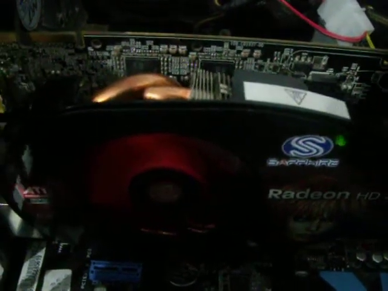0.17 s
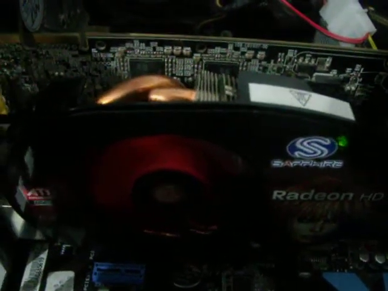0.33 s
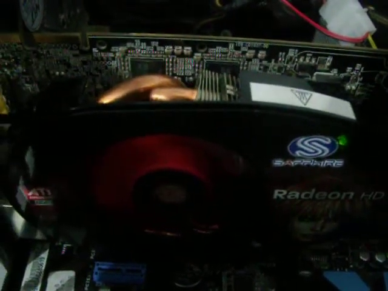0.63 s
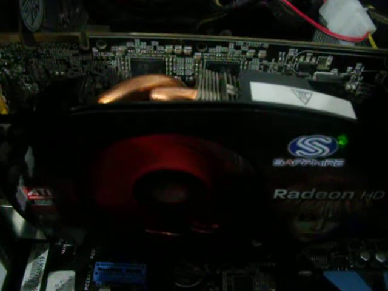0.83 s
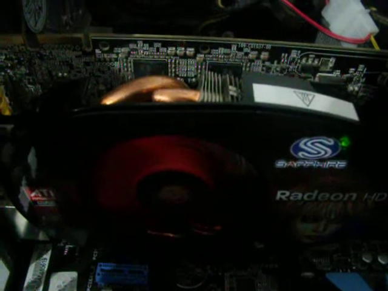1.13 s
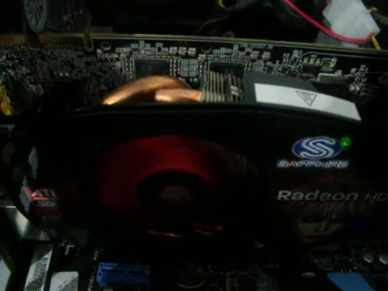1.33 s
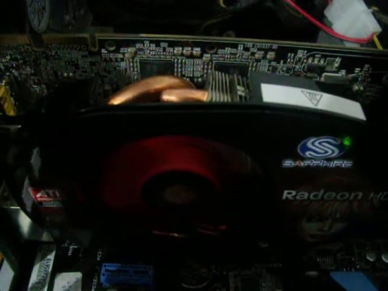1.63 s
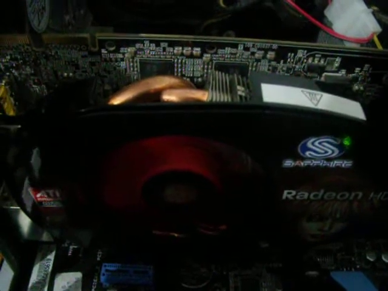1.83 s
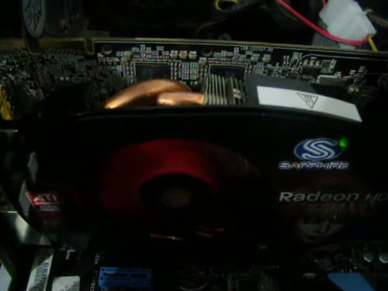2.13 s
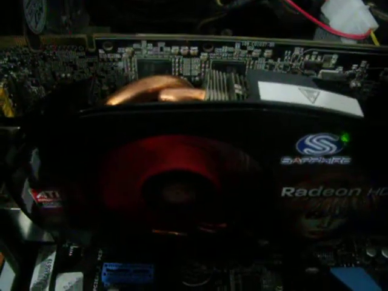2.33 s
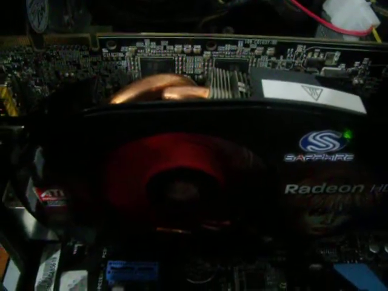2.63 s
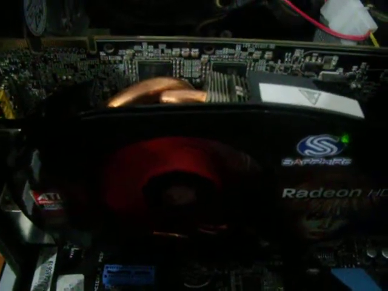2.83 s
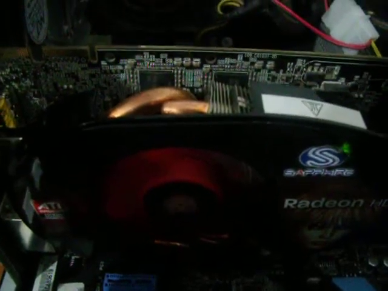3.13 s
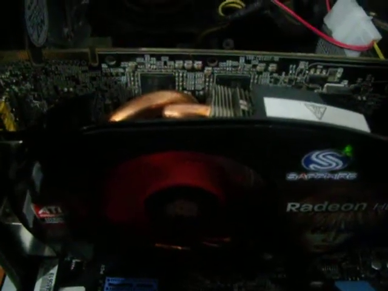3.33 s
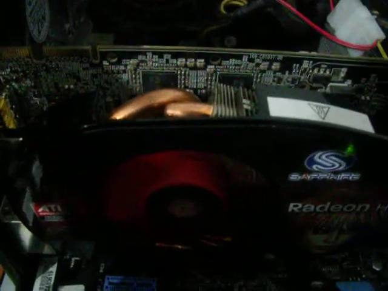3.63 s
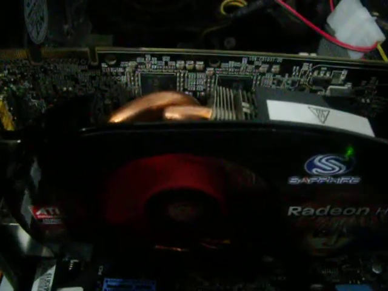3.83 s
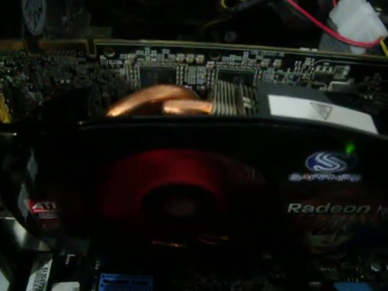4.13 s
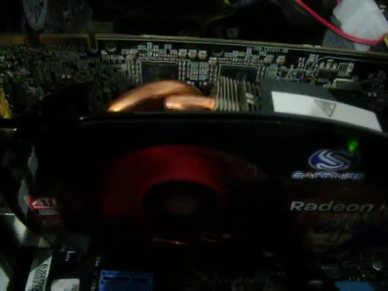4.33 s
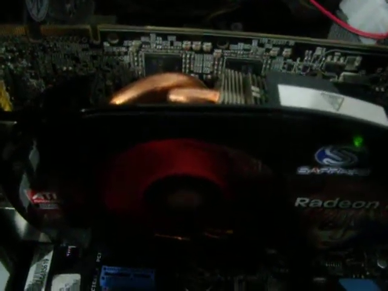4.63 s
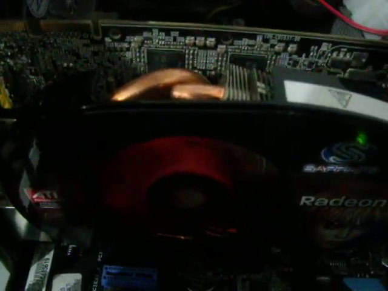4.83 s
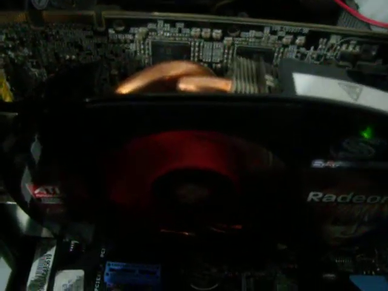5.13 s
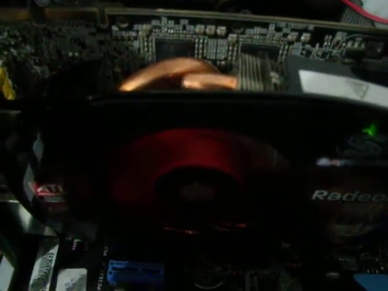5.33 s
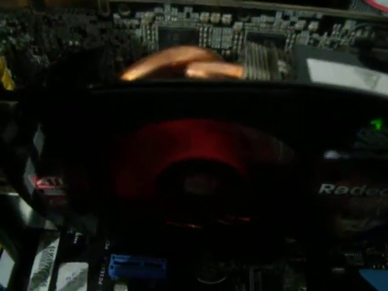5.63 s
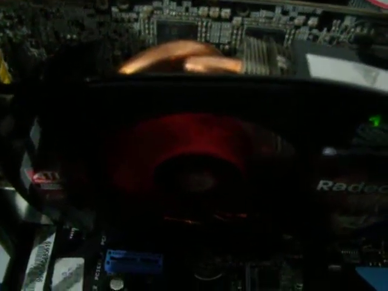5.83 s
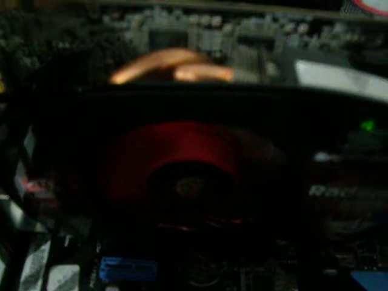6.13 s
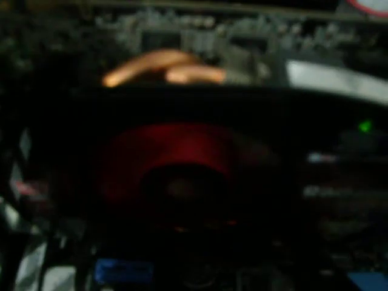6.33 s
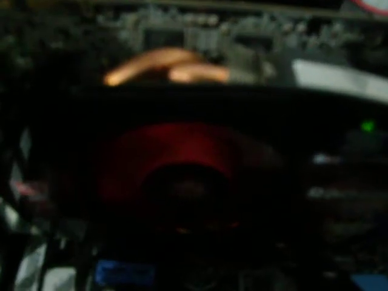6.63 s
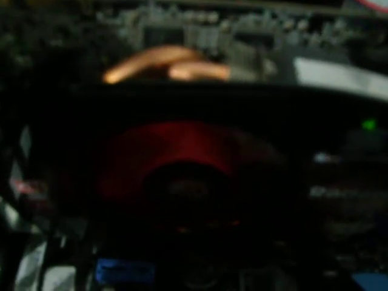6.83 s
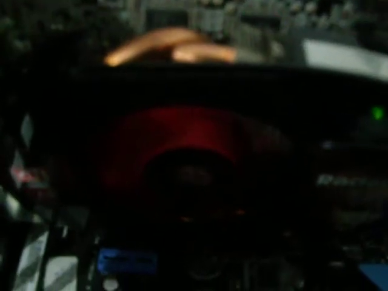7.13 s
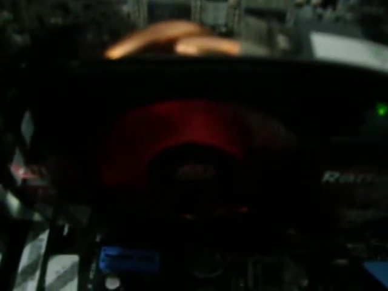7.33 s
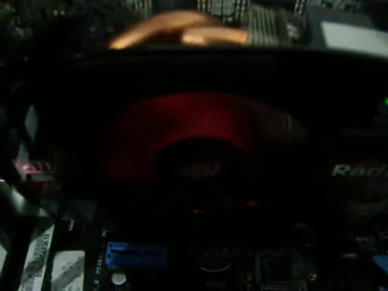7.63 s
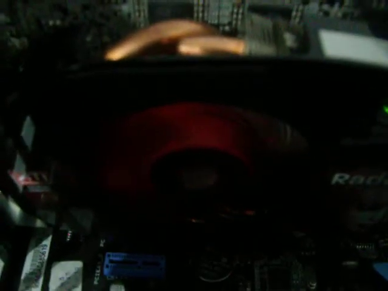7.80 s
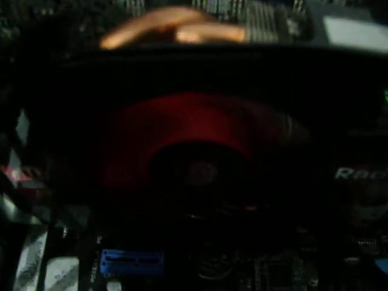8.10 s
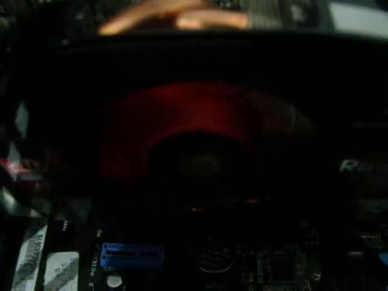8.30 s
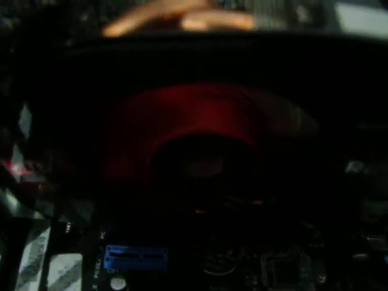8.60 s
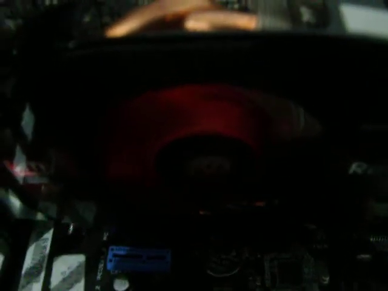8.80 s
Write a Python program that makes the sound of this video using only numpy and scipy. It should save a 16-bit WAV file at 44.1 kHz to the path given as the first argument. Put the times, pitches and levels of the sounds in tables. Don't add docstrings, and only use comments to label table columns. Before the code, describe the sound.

A handheld microphone sits close to cooling fans in an open computer case. From the start there is a steady airy whir, a low hum around 110 Hz, a faint low shudder, and blade tones near 1170 Hz that waver and beat as two rotors drift. Over it, a lens focus motor ticks rapidly, about thirty small dry clicks a second, with heavier clusters several times each second. Plastic creaks at 1.6, and a bright hard snap overloads at 1.77, with lighter ticks after. The loudest crack comes at 5.0, then a thick creak and knock at 5.6. Around 5.6 to 6 the case hum and its overtones disappear while draught buffeting swells low and lumpy. More creaks come at 6.4, 7.4, 8.1 and 8.8, the one at 8.1 with a firm snap. From about 6.6 a thin, hissy whistle near 4.7 kHz slowly rises until the end, around 9 seconds. The top end is dull.

```python
import sys
import numpy as np
from scipy import signal
from scipy.fft import rfft, irfft
from scipy.io import wavfile
from scipy.ndimage import uniform_filter1d

SR = 44100
rng = np.random.default_rng(int(sys.argv[2]) if len(sys.argv) > 2 else 0)


def ratio(d):
    e = np.asarray(d, float) / 20
    return 10 ** e


def wav_out(sig):
    wavfile.write(sys.argv[1], SR, np.round(np.clip(np.atleast_2d(sig).T, -1, 1) * 32767).astype(np.int16))


N = 395136

# time in seconds, level in dB.
CASE_HUM = [(0.1, -35), (0.42, -33.5), (3.2, -37), (3.56, -36.5), (3.9, -38), (5.9, -36.5)]
# multiple of the hum, level in dB.
CASE_ORDERS = [(3, -4.5), (4, -1), (5, -6), (6, -2), (6.92, -12), (7.93, 2), (8.93, 3), (10, -1.5),
               (18, -3.5)]
CASE_HUM_HZ, CASE_OVERTONES_DB = 111.35, -48.5

# start in seconds, stop in seconds, level in dB.
SHUDDER = [
    (0, .78, -47.5),
    (1.553, 2.15, -46.5),
    (2.3, 3.203, -57),
]
SHUDDER_HZ = 50.5

# time in seconds, level in dB.
APPROACH = [(0, -43.5), (2.4, -47), (3.2, -46), (4.5, -42), (5.5, -35.5), (5.95, -40), (6.06, -31.5),
            (6.2, -36), (6.36, -34), (6.75, -35.5), (7.05, -33.5), (7.5, -32), (7.9, -33.5), (8.05, -29.5),
            (8.2, -32), (8.7, -32.5), (8.88, -31.5), (8.96, -33.5)]
# frequency in Hz, level in dB per Hz.
DRAUGHT_SPECTRUM = [(40, -18), (70, -6), (110, 9.5), (150, 5), (200, 3), (300, -2), (420, -15.5),
                    (700, -30)]
# frequency in Hz, level in dB per Hz.
RUSH_SPECTRUM = [(15, -36.5), (30, -23.5), (55, -13), (100, -17), (160, -14.5), (240, -13), (720, -8.5),
                 (1000, -12.5), (1250, -8.5), (1600, -15.5), (2680, -16.5), (3700, -23.5), (4880, -24.5),
                 (6150, -36), (8000, -71)]
# frequency in Hz, width in Hz, level in dB.
DUCT = [(856, 19, -3), (1011, 12, -1.5), (1824, 170, -0.5), (2700, 330, -4)]
RUSH_DB, RUSH_DB_PER_DRAUGHT_DB = -35.5, 0.12

# time in seconds, level in dB.
WHISTLE = [(6.6, -58.5), (6.88, -58), (7.12, -49.5), (7.6, -45), (8.24, -41), (8.96, -39)]
# multiple of its pitch, level in dB.
WHISTLE_LINES = [(.99, -13), (1.0093, -8.5)]
WHISTLE_HZ, WHISTLE_WIDTH_HZ = 4730, 330

# time in seconds, level in dB, rustle t60 in seconds, pitch in Hz.
CREAKS = [(1.565, -23, 0.06, 1300), (1.585, -11.5, 0.036, 1300), (1.81, -21, 0.12, 1490),
          (5.559, -2, 0.079, 490), (5.576, -13, 0.096, 810), (5.575, -16, .05, 2700),
          (6.378, -15, 0.033, 1300), (6.401, -7, 0.076, 1390), (6.405, -4.5, 0.039, 844),
          (6.425, -21, 0.027, 2200), (7.441, -16.5, 0.2, 950), (8.096, -6, 0.12, 494),
          (8.096, -11.5, 0.019, 2970), (8.115, -9, 0.07, 1450), (8.836, -12.5, 0.14, 880),
          (8.836, -18, .04, 3000), (8.856, -10.5, 0.11, 1300)]
# time in seconds, level in dB, brightness in dB per octave.
SNAPS = [
    (1.5852, -19, 3),
    (1.7684, -8, 8.5),
    (1.8102, -26.5, -8),
    (1.8259, -19.5, 3),
    (5.0096, -2.5, 3.5),
    (5.5593, -19, -8),
    (7.4403, -17.5, -4.5),
    (8.096, -12, -2),
    (8.838, -18, -1),
    (8.886, -30, -13),
]
# frequency in Hz, level in dB, t60 in seconds.
SHELL_MODES = [(594, -3.5, 0.0096), (980, -7, 0.035), (1297, -6.5, 0.022), (2067, 0, 0.0085),
               (2790, -19.5, .012), (2930, -25, 0.0066), (3434, -16, 0.013), (4816, -14, 0.0063)]

# frequency in Hz, width in Hz, level in dB, ring 0-2 (low, middle, high).
BARREL = [(950, 250, -1.5, 0), (1893, 360, 0, 0), (2200, 150, -7, 0), (2715, 340, -1.5, 1),
          (3120, 350, -4.5, 1), (3795, 840, -4, 2), (4326, 415, -5, 2.6), (4750, 1000, -11.5, 1.5)]
# search start in seconds,
# bright step in seconds, stop in seconds, run-back level in dB, search level in dB.
HUNTS = [(.2, .48, .5161, -1, 0), (.71, .9472, .9823, 0, 0), (1.17, 1.3807, 1.4153, 0, 0),
         (1.58, 1.6136, 1.6495, 0, 0), (1.84, 1.9468, 1.985, -1, 1), (2.21, 2.4133, 2.4476, 1, 0),
         (2.61, 2.9168, 2.9898, 0, 0), (3.14, 3.383, 3.4139, 0, 0), (3.57, 3.7807, 3.816, 0, 0),
         (3.97, 4.2139, 4.25, 0, 1), (4.41, 4.6146, 4.647, 0, 0), (4.84, 4.8798, 4.9151, 1, 0),
         (5.07, 5.3138, 5.3607, 0, 0), (5.51, 5.7132, 5.747, 0, 0), (5.77, 5.88, 5.9164, -4, 2),
         (6.0, 6.3466, 6.38, -9, 1), (6.47, 6.512, 6.5796, -8, 0), (6.67, 6.813, 6.8613, -1, 1),
         (6.91, 7.079, 7.1173, 0, 0), (7.24, 7.5136, 7.5457, 0, 0), (7.71, 7.9834, 8.0132, 0, 0),
         (8.2, 8.8118, 8.846, 0, 0)]
# time in seconds, level in dB, brightness in dB.
CATCHES = [(.0502, -32, -2.5), (.281, -25.5, -6), (.3794, -28.5, 5), (.7808, -26, -4), (1.2455, -27.5, -6),
           (1.282, -32, -10), (1.5707, -29.5, -12), (1.811, -21, 11), (1.8267, -27, -1), (1.863, -27, -2),
           (2.3132, -26.5, 3), (2.6647, -31, 3), (2.714, -26.5, 4.5), (2.8126, -26.5, 9), (3.2602, -27, 1),
           (4.0833, -29, 1), (4.8382, -29, -9), (5.149, -28.5, 3), (5.2125, -27.5, 5), (5.5872, -28.5, -19),
           (6.4322, -27, -2), (6.8793, -25.5, 0), (7.1173, -27, 11), (7.4117, -25, 3), (8.2808, -28, -5),
           (8.6122, -25, 1), (8.664, -29, 4), (8.713, -24, 3)]
# time in seconds, level in dB.
TAPS = [
    (5.5607, -15.5),
    (5.5783, -21),
    (6.2134, -25),
    (6.312, -28),
    (6.483, -25),
    (7.0127, -26),
    (7.912, -24),
]
RESTS = [.247, .847, 2.647, 2.68, 3.247, 3.28, 4.447, 6.247, 8.347, 8.38, 8.68]
FRAME_HZ, FRAME_START_S = 30, .013
SEARCH_DB, HEAVY_DB = (-30.5, -28.5, -36), (-25.5, -26, -23)
BRIGHT_DB, STOP_DB = (-28, -27, -23.5), (-22, -25.5, -31.5)
SEARCH_SPREAD_DB = (1.5, 1.0, 2.5)
CLOSER_DB_PER_S = (-0.39, 0.14, 0.18)
TURNING_DB, HEAVY_LATE_S, CATCH_MIDDLE_DB = -3, .001, -2

# time in seconds, blade rate in Hz of blower, of twin.
ROTOR_SPEEDS = [(0, 1172, 1171), (.5, 1174, 1170.5), (1.3, 1171, 1174), (2.7, 1162.5, 1180),
                (3.6, 1164.5, 1181.5), (4.6, 1166, 1177), (5.3, 1168, 1171), (6.5, 1168, 1172),
                (7.1, 1165, 1172), (7.6, 1165.5, 1174.5), (8.4, 1167, 1172), (8.96, 1166, 1172.5)]
# time in seconds, level in dB.
BLOWER = [(0.0, -46), (4.4, -46), (5.1, -45.5), (6.44, -47.5), (6.99, -43.5), (8.96, -43.5)]
# multiple of the blade rate, level in dB.
BLOWER_ORDERS = [(.125, -10.5), (.25, -9), (1, 1.5), (1.25, -3.5)]
# time in seconds, level in dB.
TWIN = [(0, -52), (2.5, -46.5), (4.8, -43), (5.6, -51.5), (6.6, -57), (7.2, -41), (8.96, -53)]
# multiple of the blade rate, level in dB.
TWIN_ORDERS = [(.263, -10), (1, 0)]
# multiple of the blade rate, level in dB.
CLOSE_LINES = [(.7606, -52), (1.268, -54), (1.72, -57)]
BLADE_HZ = 1167.5

MIC_CUTOFF_HZ, OVERLOAD = 5330, .714


def in_time(rows):
    s, *columns = np.transpose(rows)
    return [np.interp(np.arange(N) / SR, s, c) for c in columns]


def rms_one(x):
    return x / np.sqrt(np.mean(x ** 2) + 1e-20)


def drift(rate_hz):
    r = np.exp(-80 * np.pi * rate_hz / SR)
    chance = rng.standard_normal(N // 40 + 2002)
    slow = rms_one(signal.lfilter([1], [1, -2 * r, r * r], chance)[2000:])
    return np.interp(np.arange(N) / 40, np.arange(len(slow)), slow)


def coloured(spectrum):
    hz, level_db = np.transpose(spectrum)
    grid_hz = np.fft.rfftfreq(N, 1 / SR) + 1
    gain = ratio(np.interp(np.log(grid_hz), np.log(hz), level_db))
    return rms_one(irfft(rfft(rng.standard_normal(N)) * gain, N))


def resonance(x, hz, width_hz):
    r = np.exp(-np.pi * width_hz / SR)
    zeros = np.array([1, 0, -1]) * (1 - r * r) / 2
    return signal.lfilter(zeros, [1, -2 * r * np.cos(2 * np.pi * hz / SR), r * r], x)


def bursts(times_s, level_db, t60_s, swell_s, size=N):
    clicks = np.full(size, 1e-18)
    np.add.at(clicks, (np.asarray(times_s) * SR).astype(int), ratio(level_db))
    slow = np.exp(-1 / (max(swell_s, 1e-4) * SR))
    dying = signal.lfilter([1], [1, -ratio(-60 / (t60_s * SR))], clicks)
    return signal.lfilter([1 - slow], [1, -slow], dying) * rng.standard_normal(size)


def tones(hz, orders, waver_db, waver_turns):
    turns = np.cumsum(hz) / SR
    out = np.zeros(N)
    for multiple, db in orders:
        level = ratio(db + waver_db * drift(15.0)) * np.sqrt(2)
        phase_turns = multiple * turns + waver_turns * drift(4.1) + rng.random()
        out += level * np.sin(2 * np.pi * phase_turns)
    return out


def case_fan():
    t = np.arange(N) / SR
    hum_hz, hum_db = np.full(N, CASE_HUM_HZ), in_time(CASE_HUM)[0]
    hum = ratio(hum_db) * tones(hum_hz, [(1, 0)], waver_db=.4, waver_turns=.007)
    overtones = ratio(CASE_OVERTONES_DB) * tones(hum_hz, CASE_ORDERS, waver_db=2.6, waver_turns=.3)
    hum_open = np.clip((6.05 - t) / 0.14, 0, 1)
    overtones_open = np.clip((5.65 - t) / 0.053, 0, 1)
    return hum_open * hum + overtones_open * overtones


def panel_shudder():
    t = np.arange(N) / SR
    spells = sum(ratio(db) * ((t >= start) & (t < stop)) for start, stop, db in SHUDDER)
    shake = tones(np.full(N, SHUDDER_HZ), [(1, 0)], waver_db=1.2, waver_turns=.04)
    return uniform_filter1d(spells, size=1200) * shake


def air_rush():
    draught_db, = in_time(APPROACH)
    rush_db = RUSH_DB + RUSH_DB_PER_DRAUGHT_DB * (draught_db - draught_db.mean())
    white = rng.standard_normal(N)
    duct = sum(ratio(db + 1.5 * drift(4.4)) * rms_one(resonance(white, hz, width_hz)) for hz, width_hz, db in DUCT)
    rush = coloured(RUSH_SPECTRUM) * ratio(0.89 * drift(41.0))
    return ratio(rush_db) * (rush + ratio(-11.5) * duct)


def draught():
    draught_db, = in_time(APPROACH)
    return ratio(draught_db - 2.5) * coloured(DRAUGHT_SPECTRUM) * ratio(1.3 * drift(9.0))


def mouth_whistle():
    hiss = rng.standard_normal(N)
    for widening in (1, 1, 1.7):
        hiss = resonance(hiss, WHISTLE_HZ, WHISTLE_WIDTH_HZ * widening)
    lines = tones(np.full(N, WHISTLE_HZ), WHISTLE_LINES, waver_db=0.5, waver_turns=0.19)
    facing = np.clip((np.arange(N) / SR - 6.6) / 0.27, 0, 1)
    return facing * ratio(in_time(WHISTLE)[0]) * (rms_one(hiss) + lines)


def shell_creaks():
    out = np.zeros(N + SR // 4)
    for s, db, t60_s, hz in CREAKS:
        rustle = bursts([0], db, max(t60_s, .01), swell_s=0.006, size=SR // 4)
        creak = resonance(resonance(rustle, hz, 1.34 * hz), hz, 1.34 * hz)
        out[round(s * SR):][:SR // 4] += creak
    return out[:N]


def shell_snaps():
    out = np.zeros(N)
    for k, (hz, mode_db, t60_s) in enumerate(SHELL_MODES):
        strike = np.full(N, 1e-18)
        for s, db, tilt_db in SNAPS:
            strike[round(s * SR)] = (-1) ** k * ratio(db + mode_db + np.log2(hz / 1500) * tilt_db)
        r, w = ratio(-60 / (t60_s * SR)), 2 * np.pi * hz / SR
        out += signal.lfilter([0, np.sin(w)], [1, -2 * r * np.cos(w), r * r], strike)
    return out


def motor_steps():
    frames = np.arange(FRAME_START_S, N / SR, 1 / FRAME_HZ)
    chance_db = rng.standard_normal((len(frames), 3)) * SEARCH_SPREAD_DB
    rows = [(s, db - tilt / 2, db + CATCH_MIDDLE_DB, db + tilt / 2) for s, db, tilt in CATCHES]
    rows += [(s, db - 12.0, db, db - 16.0) for s, db in TAPS]
    taken = np.r_[np.array(rows)[:, 0], RESTS]
    free = np.abs(frames[:, None] - taken).min(axis=1) > .5 / FRAME_HZ
    for start, bright, stop, back_db, search_db in HUNTS:
        heavy = bright - 1 / FRAME_HZ + HEAVY_LATE_S
        for s, kind_db in ((heavy, HEAVY_DB), (bright, BRIGHT_DB), (stop, STOP_DB)):
            rows.append((s, *np.add(kind_db, back_db)))
        searching = free & (frames >= start) & (frames < heavy - .5 / FRAME_HZ)
        for k in np.flatnonzero(searching):
            turning = frames[k] > heavy - 1.5 / FRAME_HZ
            rows.append((frames[k], *(chance_db[k] + SEARCH_DB + search_db + TURNING_DB * turning)))
    rows = np.array([row for row in rows if row[0] > .005])
    step_s = rows[:, 0]
    return step_s, rows[:, 1:] + np.outer(step_s - N / SR / 2, CLOSER_DB_PER_S)


def lens_motor():
    step_s, ring_db = motor_steps()
    idle_s = np.arange(FRAME_START_S, N / SR - .01, .5 / FRAME_HZ)
    idle_s = idle_s[np.abs(idle_s[:, None] - step_s).min(axis=1) > .008]
    idle_db = -43 + 1.9 * rng.standard_normal(len(idle_s))
    times_s = np.r_[step_s, idle_s] - .0012
    out = np.zeros(N)
    for hz, width_hz, db, ring in BARREL:
        level_db = np.r_[ring_db[:, int(ring)], idle_db] + db
        height = ratio(level_db + rng.normal(0, .8, len(times_s))) * rng.choice([-1, 1], len(times_s))
        knock = np.full(N, 1e-18)
        np.add.at(knock, (times_s * SR).astype(int), height * SR * np.e / (2 * np.pi * width_hz))
        knock = resonance(knock, hz, width_hz)
        rattle = bursts(times_s - .003, level_db + 5.5, t60_s=.022, swell_s=.002)
        out += resonance(knock + rattle, hz, width_hz)
    return out


def blower_rotors():
    blower_hz, twin_hz = in_time(ROTOR_SPEEDS)
    blower = tones(blower_hz, BLOWER_ORDERS, waver_db=1.2, waver_turns=.04)
    twin = tones(twin_hz, TWIN_ORDERS, waver_db=1.2, waver_turns=.04)
    lines = tones(np.full(N, BLADE_HZ), CLOSE_LINES, waver_db=1.2, waver_turns=.04)
    close = np.clip(np.arange(N) / SR - 6.5, 0, 1)
    return ratio(in_time(BLOWER)[0] + 1.5) * blower + ratio(in_time(TWIN)[0]) * twin + close * lines


def scene():
    background = case_fan() + panel_shudder() + air_rush() + draught() + mouth_whistle()
    camera = shell_creaks() + shell_snaps() + lens_motor()
    return (background + camera + blower_rotors())[None]


def band_limit(x):
    return signal.sosfilt(signal.butter(12, 16000, fs=SR, output="sos"), x)


def record(dry):
    running = np.c_[dry[:, 500:0:-1], dry]
    dull = signal.sosfilt(signal.butter(8, MIC_CUTOFF_HZ, fs=SR, output="sos"), running)
    dull = signal.sosfilt(signal.cheby2(16, 70, 6600.0, fs=SR, output="sos"), dull)[:, 500:]
    mix = np.clip(dull - .0027, -OVERLOAD, OVERLOAD)
    return band_limit(mix)


dry = scene()
out = record(dry)
wav_out(out)
```